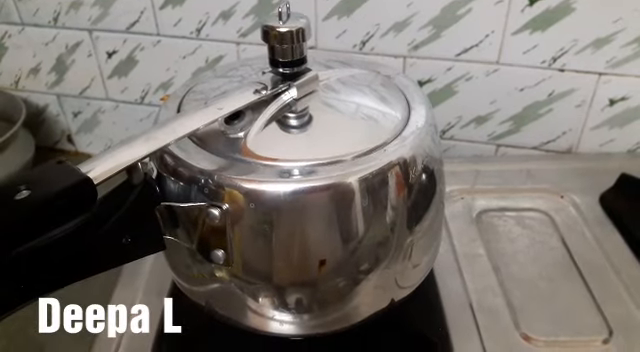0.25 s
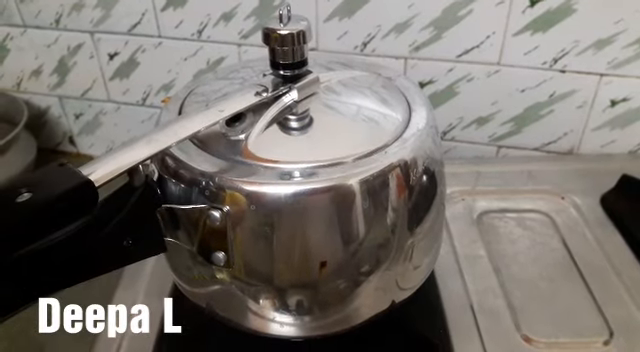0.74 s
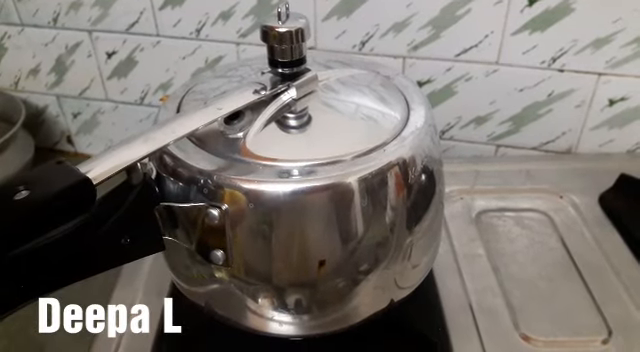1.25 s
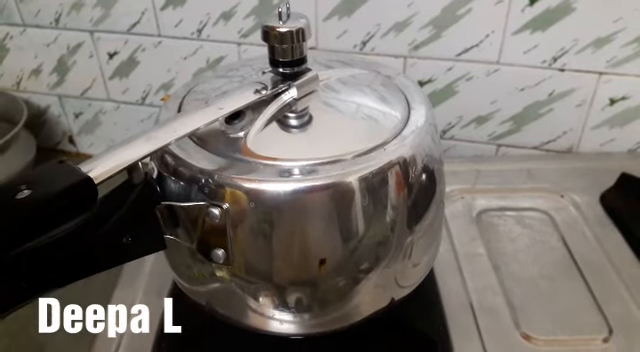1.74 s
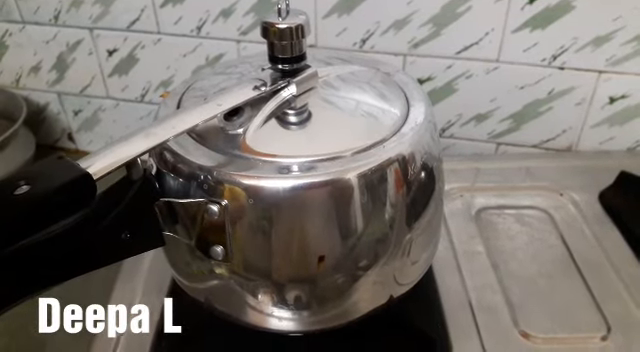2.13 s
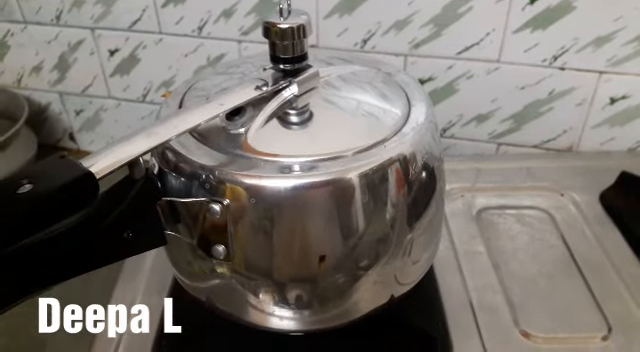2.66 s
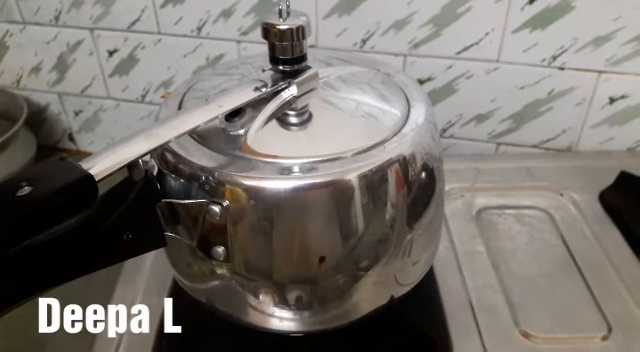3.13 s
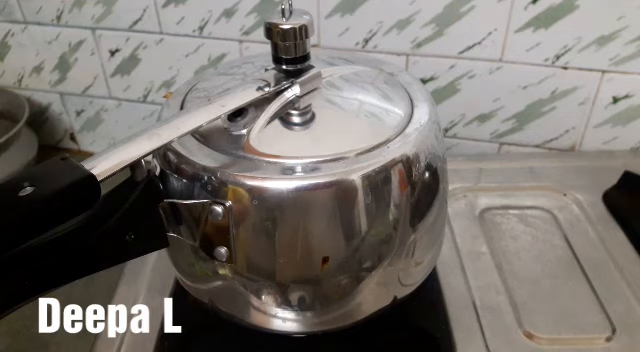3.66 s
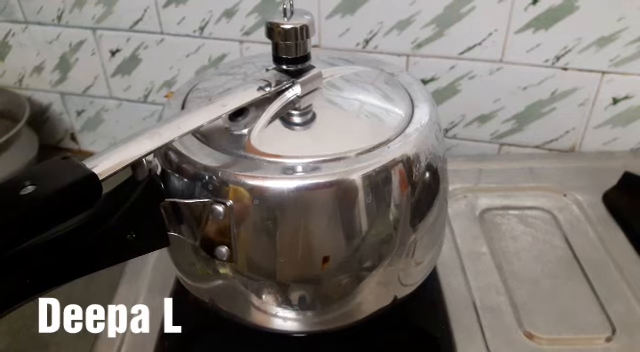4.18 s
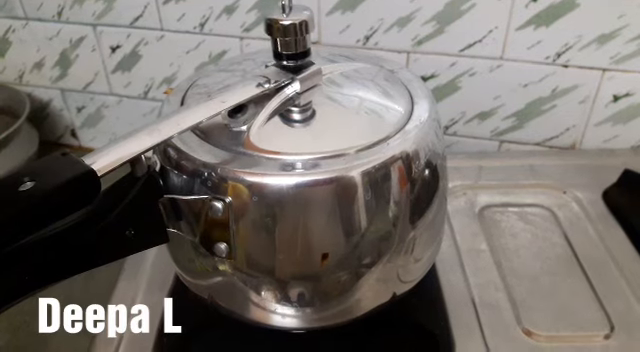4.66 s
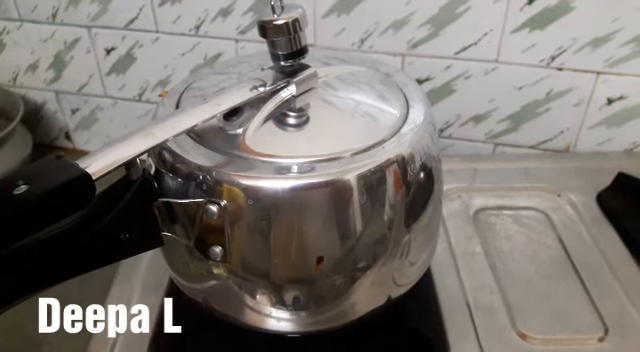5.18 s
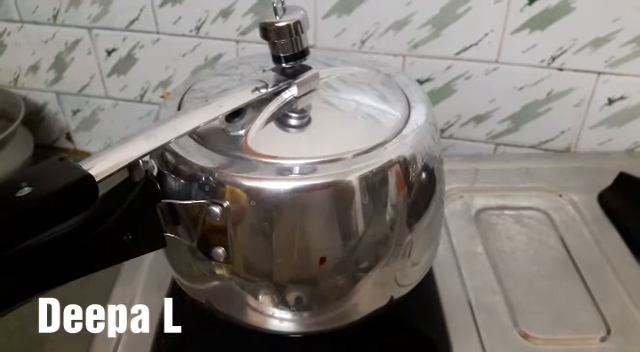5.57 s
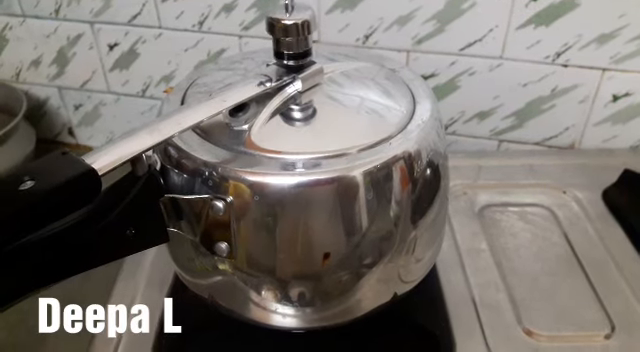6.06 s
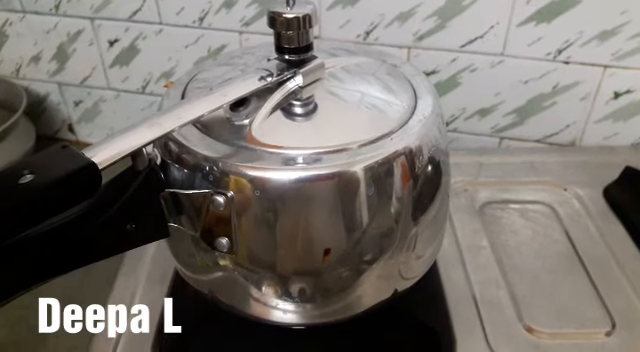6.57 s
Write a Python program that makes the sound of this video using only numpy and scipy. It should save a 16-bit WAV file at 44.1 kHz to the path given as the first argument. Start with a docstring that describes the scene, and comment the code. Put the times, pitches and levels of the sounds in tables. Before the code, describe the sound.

Steam leaks from a rumbling pressure cooker, builds, and blasts out with a whistling hiss, buffeting the microphone before dying down.

```python
"""A pressure cooker rumbles and drones on a stove in a tiled kitchen.
From the start, steam hisses, squeaks and spits water from under the weight on its valve.
The leak surges and grows until, near 4.8 s, the weight lifts and a jet blasts out,
its eddies (little swirls of steam) slapping the microphone.
Just after 6 s the weight drops back, the hiss dies down and the wet valve seat sputters."""
import sys
import numpy as np
from scipy import signal
from scipy.fft import rfft, irfft, next_fast_len
from scipy.io import wavfile
from scipy.ndimage import map_coordinates

SR = 44100
rng = np.random.default_rng(int(sys.argv[2]) if len(sys.argv) > 2 else 0)


def transcribe(u):
    """Save the signal u as a 16-bit wav file named by the first command-line argument.

    u: samples, shape (n,) or (channels, n), limited to [-1, 1]; the rate is SR.
    q: integer samples, one column per channel.
    """
    v = np.clip(np.atleast_2d(u).T, -1, 1)
    q = np.round(v * 32767).astype(np.int16)
    wavfile.write(sys.argv[1], SR, q)


N = 300331

# The tone colour of the hollow under the weight. Each row: frequency in Hz, level in dB.
HOLLOW_SPECTRUM = [(700, -80), (1200, -23.5), (1550, -12), (1850, -5), (2130, -7), (2240, 1.5),
                   (2430, -0.5), (2580, -8), (2800, -7), (3100, -16.5), (3700, -18), (5000, -59.5)]
OPEN_S, CLOSE_S = 4.805, 6.13  # the weight is fully up; it drops back
ROAR_START_S, ROAR_END_S = OPEN_S + 0.06, 6.11  # the jet's low roar and wind last a little less long
LEAK_DB, JET_DB = -44, -16.5  # the steady leak; the open jet


def amp(db):
    """Turn decibels into a gain, the number a signal is multiplied by."""
    return 10 ** (np.asarray(db) / 20)


def unit(x):
    """Scale x to an average (rms) level of 1."""
    return x / np.sqrt(np.mean(x ** 2) + 1e-20)


def along(points, hz):
    """Read between rows of frequency and value, giving each octave equal room."""
    freqs, values = np.transpose(points)
    return np.interp(np.log(hz + 1), np.log(freqs + 1), values)


def wobble(rate):
    """A smooth curve through `rate` random values a second."""
    values = rng.standard_normal(int(N * rate / SR) + 4)
    return map_coordinates(values, [np.arange(N) * rate / SR])


def filtered(x, response):
    """Multiply each frequency in x by response(hz)."""
    size = next_fast_len(N + SR // 2)
    return irfft(rfft(x, size) * response(np.fft.rfftfreq(size, 1 / SR)), size)[..., :N]


def noise(spectrum):
    """Noise of level 1 with the given tone colour."""
    return unit(filtered(rng.standard_normal(N), lambda hz: amp(along(spectrum, hz))))


def fuzzy_tone(centre_hz, width_hz):
    """Noise of level 1, squeezed into a narrow band around one pitch."""
    white = rng.standard_normal(N)
    return unit(filtered(white, lambda hz: 1 / (1 + ((hz - centre_hz) / (.5 * width_hz + 1)) ** 2)))


def swells(rows):
    """A gain made of smooth humps. Each row: peak time in seconds, level in dB, length in seconds."""
    t = np.arange(N) / SR
    return np.sqrt(sum(amp(db) ** 2 * np.exp(-2 * np.minimum((2 * (t - s) / length) ** 2, 20))
                       for s, db, length in rows))


def outflow(start, end, rise, sag=0, fall=269):
    """A gain that rises until start, sags from there and falls after end; slopes in dB per second."""
    t = np.arange(N) / SR
    rising_db = -rise * np.maximum(start - t, 0)
    return amp(rising_db - sag * np.maximum(t - start, 0) - fall * np.maximum(t - end, 0))


def hush(drop_db=-14.5, settle_s=0.2):
    """A gain that turns the leak and the pot down once the valve has shut."""
    return amp(drop_db * np.clip((np.arange(N) / SR - CLOSE_S) / settle_s, 0, 1))


def dip(middle_s=4.775, length_s=0.12, depth_db=-39.5):
    """A gain that makes the low sounds dip briefly just before 4.8 s."""
    away = 2 * np.abs(np.arange(N) / SR - middle_s) / length_s
    return amp(depth_db / (1 + away ** 10))


def leak_strength(built_up_s=4.23, built_up_db=-36.5):
    """How hard steam leaks under the weight: a steady seep, growing with the pressure, plus spurts."""
    # Pressure nudges the weight. Each row: peak time in seconds, level in dB, length in seconds.
    spurts = [(.02, -40.5, 0.21), (.16, -39, .08), (.26, -46, .12), (2.42, -42.5, 0.19),
              (2.83, -41.5, 0.14), (3.06, -39, 0.097), (3.44, -37.5, 0.27), (3.65, -37, .12),
              (3.79, -32.5, 0.2), (4.11, -30, 0.2), (4.22, -32, 0.19), (4.45, -30.5, 0.28),
              (4.87, -21.5, 0.15), (5.48, -20, .22)]
    last_wisp = (6.67, -55, .21)  # from the wet seat
    build_up = amp(built_up_db) * outflow(built_up_s, CLOSE_S, rise=12.5)
    seep = np.hypot(amp(LEAK_DB) * hush(), build_up)  # hypot adds the power of two sounds
    return np.hypot(seep, swells(spurts + [last_wisp]))


def hiss(leak, grain_db=0.47, treble_hz=8500, brightening=0.14, neutral_db=-21):
    """Escaping steam hisses: brighter when it is faster, and grainy because it is wet."""
    # The tone colour of the steam. Each row: frequency in Hz, level in dB.
    hiss_spectrum = [(1500, -71), (2700, -12), (3300, -11), (4300, -13), (4850, -9), (5150, -2.5),
                     (5500, -7), (6400, 0), (7400, 0), (7950, -7.5), (8500, -6.5), (11500, -7), (12800, -6),
                     (15800, -10.5)]
    flow = np.hypot(leak, amp(JET_DB) * jet())
    droplets = amp(grain_db * wobble(700))
    rush = noise(hiss_spectrum)
    treble = filtered(rush, lambda hz: 1 - 1 / (1 + (hz / treble_hz) ** 10))
    extra_treble = (flow / amp(neutral_db)) ** brightening - 1
    return (rush + treble * extra_treble) * flow * droplets


def hollow(leak, growth=0.81, flutter_db=0.5):
    """Steam makes the hollow under the weight ring; it answers the jet a moment late."""
    from_leak = amp(LEAK_DB - 3.5) * (leak / amp(LEAK_DB)) ** growth
    from_jet = amp(JET_DB - 6) * jet(delay_s=0.013)
    return noise(HOLLOW_SPECTRUM) * np.hypot(from_leak, from_jet) * amp(flutter_db * wobble(60))


def roar(leak, leak_roar_db=-55.5, jet_roar_db=-32.5, growth=0.48):
    """The steam's low roar: faint in the leak, strong just after the jet opens."""
    # The tone colour of the roar. Each row: frequency in Hz, level in dB.
    roar_spectrum = [(60, -15), (250, -5.5), (600, -7), (750, -3.5), (1100, -3.5), (1500, -4),
                     (2500, -32.5)]
    surge = leak / hush() / amp(LEAK_DB)
    from_leak = amp(leak_roar_db) * surge ** growth * hush() * dip()
    from_jet = amp(jet_roar_db) * outflow(ROAR_START_S, ROAR_END_S, rise=501, sag=2.5)
    return noise(roar_spectrum) * np.hypot(from_leak, from_jet)


def steam(flutter_db=0.5):
    """Leak and jet drive the hiss, the hollow and the roar, which all flutter together."""
    leak = leak_strength()
    flutter = amp(flutter_db * wobble(45))
    return (hiss(leak) + hollow(leak) + roar(leak)) * flutter


def boil(rumble_db=-56, drone_db=-60, drone_hz=269, waver_hz=3.9):
    """Boiling water and the flame rumble under a wavering drone that comes and goes."""
    # The tone colour of the pot. Each row: frequency in Hz, level in dB.
    pot_spectrum = [(20, -7.5), (50, -13.5), (85, 0.5), (145, 1), (180, -9), (245, -1), (300, -1.5),
                    (450, -5.5), (720, -14), (1200, -27)]
    # The drone's strongest swells. Each row: peak time in seconds, level in dB, length in seconds.
    drone_swells = [(.44, -52.5, 0.16), (.62, -49.5, 0.13), (1.23, -52, 0.11), (1.65, -58, .18),
                    (2.57, -54, 0.1), (2.81, -51, 0.093), (3.06, -51, 0.075), (3.68, -55, 0.36),
                    (4.43, -53, .12), (4.63, -48, 0.062), (6.2, -43, 0.13)]
    # Weaker tones around the drone. Each row: pitch in Hz, width in Hz, level in dB.
    hum_tones = [(148.7, 9.1, -5.5), (246, 8.8, -9.5), (350, 9, -9), (443.5, 5, -20)]
    phase = 2 * np.pi * np.cumsum(drone_hz + waver_hz * wobble(21)) / SR
    strength = np.hypot(amp(drone_db + 3 * wobble(8.7)), swells(drone_swells))
    drone = unit(np.sin(phase) * amp(1.7 * wobble(22))) * strength
    hum = sum(amp(db) * fuzzy_tone(hz, width) for hz, width, db in hum_tones)
    welling = swells([(.47, -51, .2)])  # the water wells up once
    water = np.hypot(amp(rumble_db), welling) * (noise(pot_spectrum) + amp(-2) * hum)
    return (drone + water) * hush() * dip()


def squeaks():
    """Faint, husky tones swell and fade as steam squeezes past the weight."""
    # Each row: peak time in seconds, level in dB, length in seconds, pitch in Hz, width in Hz.
    husky_tones = [(0.032, -45, 0.13, 1694, 140), (0.068, -48, 0.13, 960, 130),
                   (0.101, -42.5, 0.02, 970, 138.9), (0.016, -45.5, 0.072, 4500, 610),
                   (0.217, -39, 0.038, 2420, 290), (0.219, -39, 0.041, 1780, 790),
                   (3.435, -54.5, 0.32, 726, 30)]
    t = np.arange(N) / SR
    return sum(amp(db) * np.exp(-(2 * (t - s) / length) ** 2) * fuzzy_tone(hz, width)
               for s, db, length, hz, width in husky_tones)


def spits(attack_s=0.00057, crackle_db=3, fizz_db=-14, fizz_s=0.037, ring_db=-16, ring_s=0.02):
    """Each drop bursts through the valve as a crackling splash, rings the hollow and fizzes away."""
    # Drops of water. Each row: start in seconds, level in dB, length in seconds,
    # fine spray in dB compared with the splash.
    drops = [(0.109, -31, 0.0065, -8), (0.12, -30, 0.011, 3.5), (0.15, -31.5, .005, -5),
             (2.284, -41, 0.0065, 3), (2.366, -34.5, 0.0048, 0), (2.375, -33, 0.0074, -11),
             (2.457, -32, 0.007, -5), (2.61, -37.5, 0.0055, -1), (2.802, -31.5, 0.0074, -14),
             (3.339, -27, 0.0045, -5), (3.439, -24, 0.0035, -4), (3.518, -26.5, 0.0051, -6),
             (3.586, -30.5, 0.0023, -9), (3.631, -34, .003, 1.5), (6.462, -49, 0.0028, -11),
             (6.54, -45, 0.005, -18), (6.588, -44, 0.002, -10.5), (6.609, -42, 0.005, -8),
             (6.622, -46, 0.015, -15), (6.676, -36.5, 0.0044, -20), (6.731, -50.5, 0.0074, -1)]
    # The tone colours of the splash and the fine spray. Each row: frequency in Hz, level in dB.
    splash_spectrum = [(300, -14.5), (1100, -7), (1800, 2.5), (2400, -3), (4200, -14), (5300, 7),
                       (6200, 8.5), (7300, 2.5), (8200, -5), (15800, -19.5)]
    spray_spectrum = [(2000, -12), (3000, -3.5), (4200, -12), (8000, -4.5), (13000, -7.5), (15800, -3)]
    t = np.arange(SR // 4) / SR
    splash, spray, ring = np.zeros((3, N + SR))
    for s, db, length, spray_db in drops:
        span = slice(round(s * SR), round(s * SR) + len(t))
        attack = amp(db) * (1 - np.exp(-t / attack_s))
        burst = attack * (np.exp(-(t / length) ** 2) + amp(fizz_db) * np.exp(-t / fizz_s))
        splash[span] += burst
        spray[span] += burst * amp(spray_db)
        ring[span] += attack * amp(ring_db) * np.exp(-t / ring_s)
    crackle = unit(amp(crackle_db * wobble(1500)))
    water = splash[:N] * noise(splash_spectrum) + spray[:N] * noise(spray_spectrum)
    return water * crackle + ring[:N] * noise(HOLLOW_SPECTRUM)


def jet(delay_s=0):
    """The jet's gain: it opens as the weight lifts, weakens as the pot empties, then shuts off."""
    return outflow(OPEN_S + delay_s, CLOSE_S, rise=100, sag=1.04)


def eddy(t, width):
    """One swirl's swing in air pressure: a build-up, a quick flip and a slower recovery."""
    flip = np.tanh(t / (0.12 * width))
    return 1.42 * flip * np.exp(-np.abs(t) / np.where(t < 0, 0.65 * width, width))


def gusts(strong_s=0.0011, small_s=0.00085, small_count=1200, gust_s=0.043, draught_db=-31.5):
    """Steam slaps the microphone: each gust is one strong eddy amid small ones and a rumble."""
    # Gusts of steam. Each row: time in seconds, level in dB.
    puffs = [(4.878, -7), (4.923, -5.5), (4.95, -6), (4.961, -6), (4.987, -10), (5.037, -10.5), (5.15, -3),
             (5.162, -7), (5.232, -8.5), (5.323, -15), (5.34, -12), (5.418, -9.5), (5.453, -6.5),
             (5.491, -12.5), (5.568, -7.5), (5.588, -12.5), (5.628, -6.5), (5.659, -7.5), (5.698, -7.5),
             (5.721, -7.5), (5.802, -9.5), (5.858, -8), (5.912, -9.5), (5.968, -7.5), (6.044, -14),
             (6.075, -9)]
    # The tone colour of the wind's rumble. Each row: frequency in Hz, level in dB.
    rumble_spectrum = [(40, -23), (85, -1.5), (130, 3), (250, -4), (500, -16.5), (1200, -47)]
    t = np.arange(-SR // 50, SR // 50) / SR
    strong, patter = np.zeros((2, N))
    for s, db in puffs:
        size, lean, sign = rng.uniform(-1, 1, 3)
        lopsided = 1 + 0.21 * lean * np.sign(t)
        slap = np.sign(sign) * amp(db - 2) * lopsided * eddy(t, strong_s * np.exp(size))
        strong[round(s * SR) - len(t) // 2:][:len(t)] += slap
    for s in rng.uniform(ROAR_START_S, ROAR_END_S, small_count):
        size, push = rng.standard_normal(2)
        tap = push * abs(push) * eddy(t, small_s * np.exp(0.51 * size))
        patter[round(s * SR) - len(t) // 2:][:len(t)] += tap
    patter /= np.std(patter[patter != 0])
    flurries = swells([(s, db - 15, gust_s) for s, db in puffs])
    blowing = outflow(ROAR_START_S, ROAR_END_S, rise=1200, fall=1200)
    strength = np.hypot(amp(draught_db), flurries) * blowing
    draught = (patter + amp(-4) * noise(rumble_spectrum)) * strength
    low_cut = signal.butter(3, 72, "highpass", fs=SR, output="sos")  # slow pressure leaks away
    return signal.sosfilt(low_cut, strong + draught)


def kitchen(x, echo_db=-11, tail_db=-10, echo_count=10):
    """Lid and tiles throw back quick echoes that colour the hiss; the room adds a short tail."""
    # How long the room rings. Each row: frequency in Hz, seconds to fade by 60 dB.
    fade_times = [(200, 0.83), (2500, 0.4), (7000, 0.39), (15000, 0.28)]
    echoes = np.zeros(SR // 50)
    echoes[(rng.uniform(.001, .014, echo_count) * SR).astype(int)] = rng.standard_normal(echo_count)
    hz, t, bands = signal.stft(rng.standard_normal(SR // 2), SR, nperseg=256)
    fade = amp(-60 * t / along(fade_times, hz)[:, None])
    tail = signal.istft(bands * fade, SR, nperseg=256)[1]
    room = amp(tail_db) * tail / np.linalg.norm(tail)
    room[:len(echoes)] += amp(echo_db) * echoes / np.linalg.norm(echoes)
    room[0] += 1  # the direct sound
    return signal.fftconvolve(x, room / np.linalg.norm(room))[:N]


def scene():
    """The valve's sounds in the room, plus the pot and the gusts, alike in both channels."""
    mono = kitchen(steam() + spits() + squeaks()) + boil() + gusts()
    return np.array([mono, mono])


def record(dry, ceiling=0.82, top_hz=15800):
    """Round off the highest peaks and remove the very top of the treble."""
    rounded = dry / (1 + np.abs(dry / ceiling) ** 6) ** (1 / 6)
    return filtered(rounded, lambda hz: hz < top_hz)


dry = scene()
out = record(dry)
transcribe(out)
```